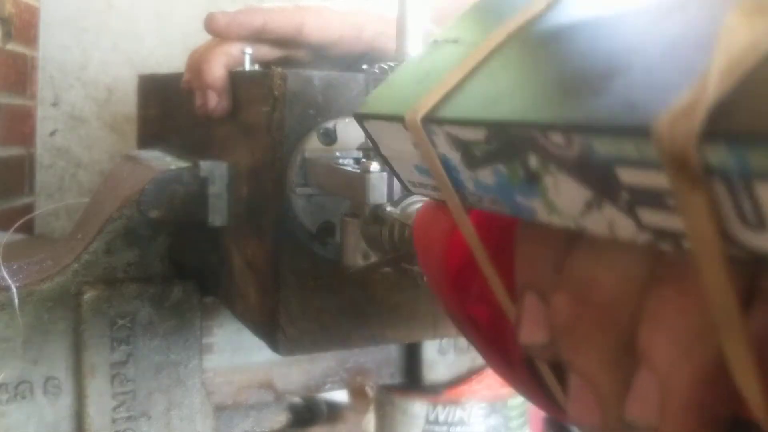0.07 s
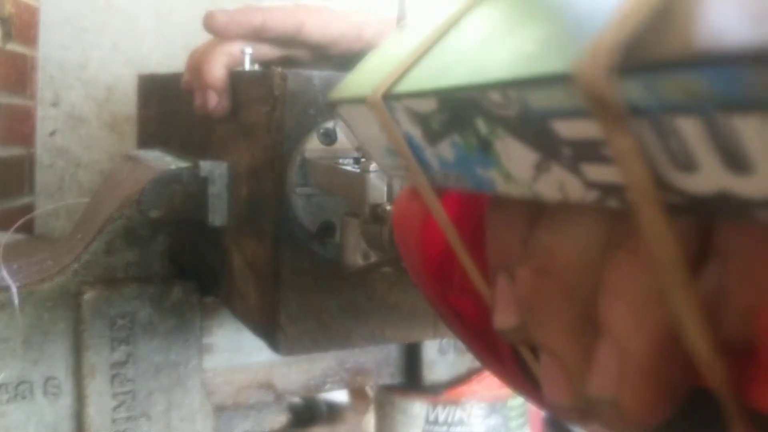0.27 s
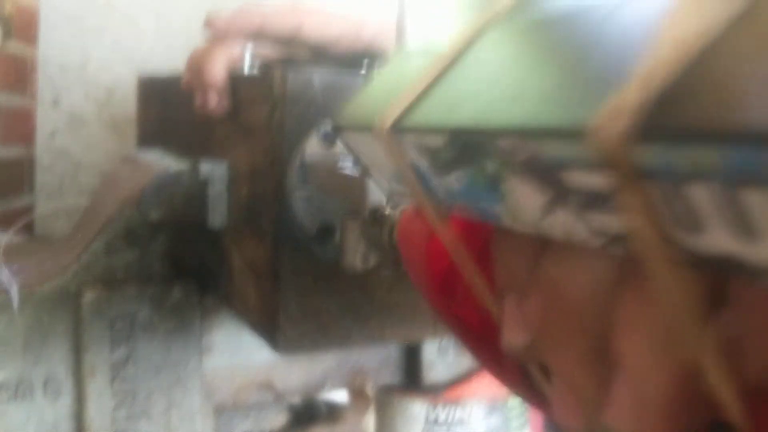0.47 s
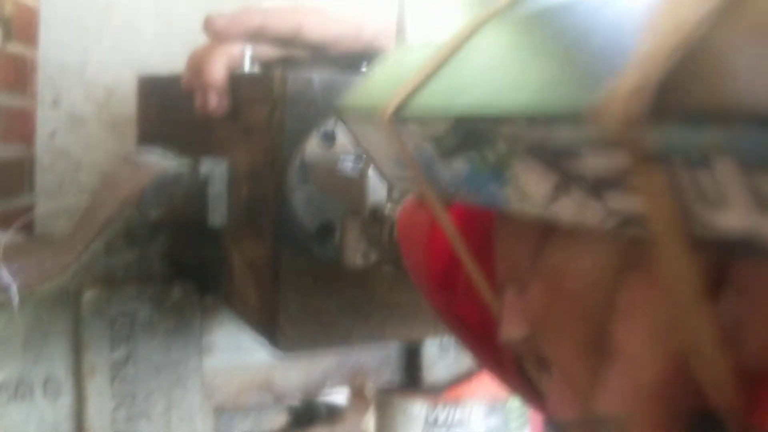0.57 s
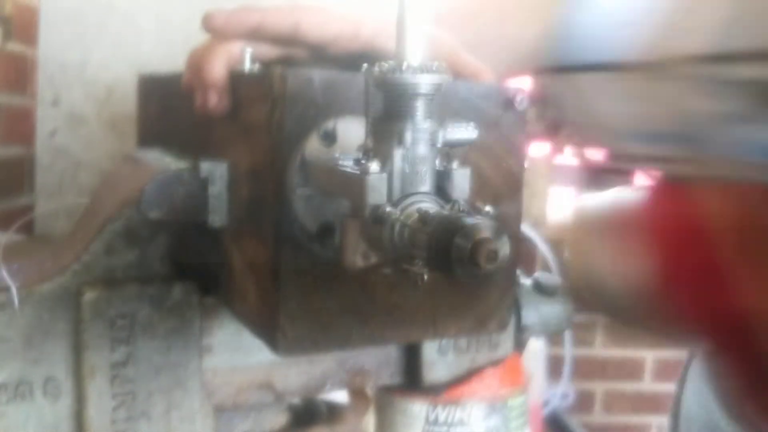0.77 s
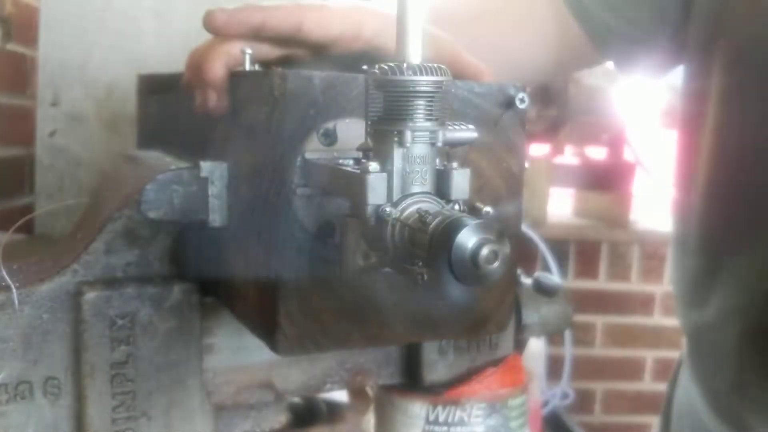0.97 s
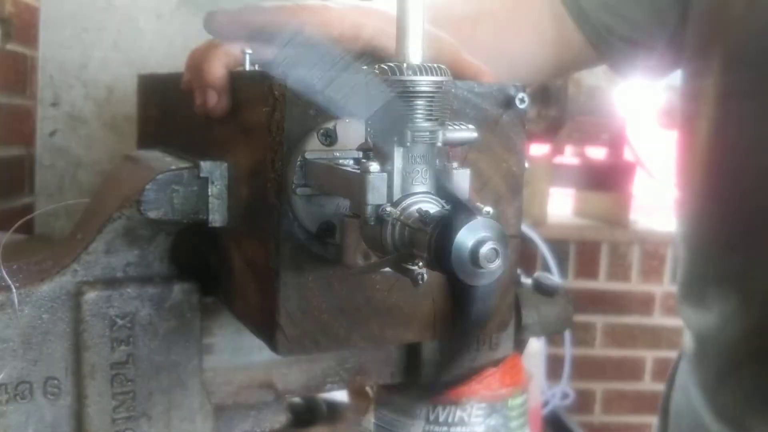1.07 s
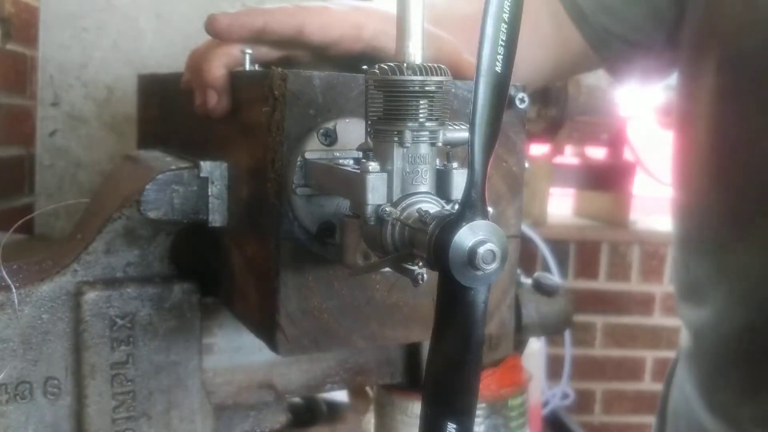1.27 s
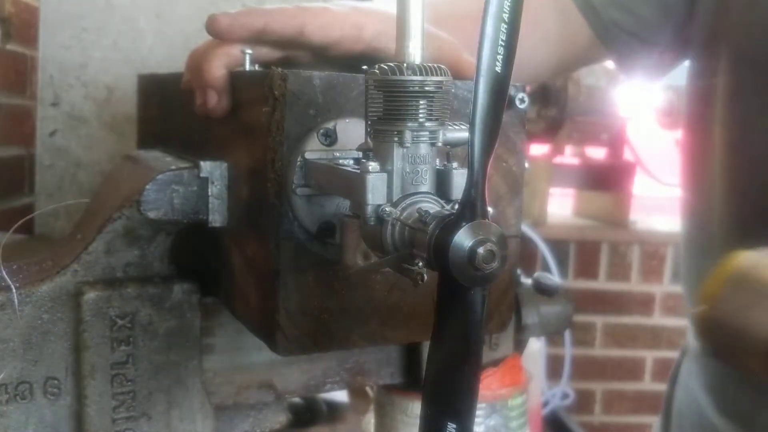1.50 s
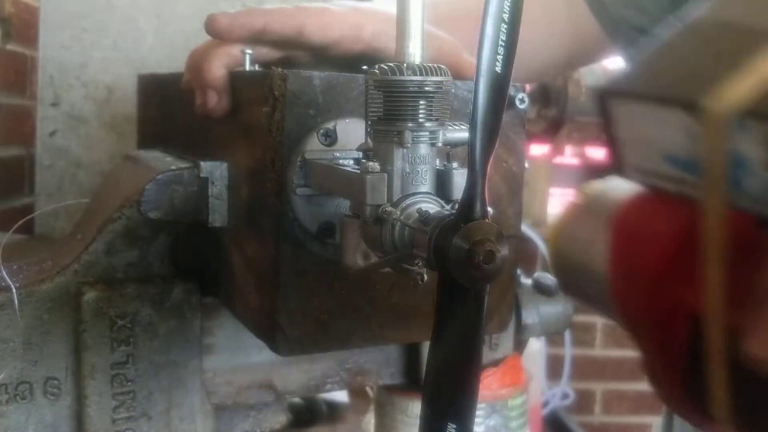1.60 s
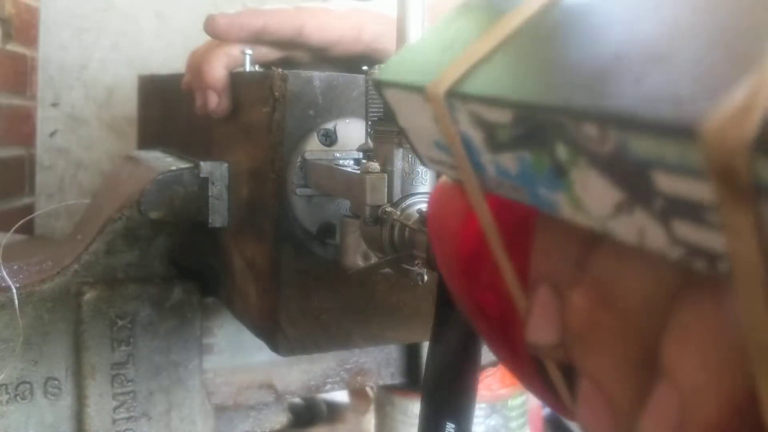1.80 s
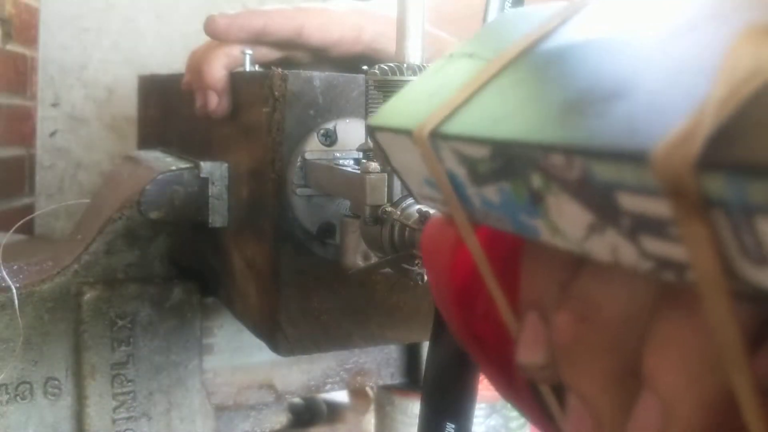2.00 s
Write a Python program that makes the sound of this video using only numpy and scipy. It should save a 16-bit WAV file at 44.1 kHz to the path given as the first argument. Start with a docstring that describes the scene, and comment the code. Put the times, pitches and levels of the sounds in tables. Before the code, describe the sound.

A model engine cranked by a handheld starter pops and clatters rapidly, then one knock.

```python
"""A low rumble and a rising rattle: a handheld electric starter spins a small model engine, clamped
in a vice by a brick wall, and the propeller stirs the air. The starter clacks, the piston squeaks, and
each turn ends in a soft puff of compressed air or, when the charge catches, a crack that overloads the
microphone. The engine coasts to rest, and the starter knocks back onto its nose."""
import sys
import numpy as np
from scipy import signal
from scipy.fft import rfft, irfft
from scipy.io import wavfile

SR = 44100
rng = np.random.default_rng(int(sys.argv[2]) if len(sys.argv) > 2 else 0)


def unload_wav(signal):
    """Save mono or channel-first audio to the path in sys.argv[1] as 16-bit WAV at rate SR, clipped to [-1, 1]."""
    wavfile.write(
        sys.argv[1],
        SR,
        np.round(np.clip(np.atleast_2d(signal).T, -1, 1) * 32767).astype(np.int16),
    )


N = 90404
TIME = np.arange(N) / SR


def from_db(db):
    """Decibels to gain."""
    return 10 ** (np.asarray(db) / 20)


def unit_rms(x):
    """Scale to unit power."""
    return x / np.sqrt(np.mean(x ** 2) + 1e-20)


def envelope(points):
    """Gain riding through (time [s], level [dB]) points."""
    return from_db(np.interp(TIME, *np.transpose(points)))


def impulses(hits):
    """One impulse for each (time [s], level [dB]) hit."""
    out = np.zeros(N)
    for s, db in hits:
        out[round(s * SR)] += from_db(db)
    return out


def eq(x, curve):
    """Minimum-phase EQ through (frequency [Hz], gain [dB]) points."""
    size = 8192
    hz, db = np.transpose(curve)
    grid = np.maximum(np.arange(size // 2 + 1) * SR / size, 1)
    gain = from_db(np.interp(np.log(grid), np.log(hz), db))
    cepstrum = irfft(np.log(gain))
    cepstrum[1:size // 2] *= 2  # fold onto positive time: no ringing ahead of a hit
    cepstrum[size // 2 + 1:] = 0
    response = irfft(np.exp(rfft(cepstrum)))[:size // 2]
    return signal.oaconvolve(x, response)[:N]


def decay(x, tau_s):
    """Lets each impulse die away exponentially."""
    return signal.lfilter([1], [1, -np.exp(-1 / (tau_s * SR))], x + 1e-18)


def ring(x, modes):
    """Damped resonances (frequency [Hz], level [dB], t60 [s]) driven by x."""
    out = 0
    for hz, db, t60 in modes:
        radius = from_db(-60 / (t60 * SR))
        real = radius * np.cos(2 * np.pi * hz / SR)
        out = out + from_db(db) * signal.lfilter([1, -real], [1, -2 * real, radius ** 2], x + 1e-18)
    return out


# Swell of the low end (time [s], level [dB])
RUMBLE_ENVELOPE = [(0, -27.5), (.04, -58), (.2, -46), (.3, -35.5), (.42, -29), (.49, -33), (.57, -29),
                   (.67, -30.5), (.78, -27.5), (.84, -47), (1.05, -34), (1.16, -46), (1.25, -46.5),
                   (1.44, -46), (1.52, -56), (2.05, -54.5)]
# Boomy tone of moving air and shaking bench (frequency [Hz], gain [dB])
RUMBLE_EQ = [(25, -26), (45, -13.5), (65, -10), (80, -13.5), (100, 0.5), (125, -6.5), (180, -14.5),
             (300, -24), (800, -30), (3000, -101)]
# Jolts to the bench (time [s], level [dB])
BUMPS = [(.0, -43), (.405, -17), (.560, -21), (.715, -17), (.778, -14.5), (1.563, -31)]
def rumble(bump_hz=95, bump_t60_s=0.11):
    """Propeller wash and bench vibration, with dull bumps as the starter jolts the bench."""
    bumps = ring(impulses(BUMPS), [(bump_hz, 0, bump_t60_s)])
    bumps = signal.sosfilt(signal.butter(2, 180, fs=SR, output="sos"), bumps)
    wash = unit_rms(eq(rng.standard_normal(N), RUMBLE_EQ))
    return envelope(RUMBLE_ENVELOPE) * wash + bumps


# Dark tone of the yard's ambience (frequency [Hz], gain [dB])
AIR_EQ = [(18, -27), (32, 6), (60, 13.5), (110, -5), (230, -4.5), (400, -5), (1000, -11), (2000, -11.5),
          (6000, -15.5), (16000, -19)]
def still_air(level_db=-48.5):
    """The air of the yard: a faint, steady bed of noise."""
    return from_db(level_db) * unit_rms(eq(rng.standard_normal(N), AIR_EQ))


# The rattle builds, holds and falls away (time [s], level [dB])
RATTLE_ENVELOPE = [(0, -76), (.13, -55), (.17, -44.5), (.215, -43.5), (.25, -35.5), (.4, -33.5), (.6, -31),
                   (.8, -32.5), (1.0, -30.5), (1.075, -35), (1.115, -33), (1.14, -47.5), (1.22, -51.5)]
# Its bright clatter (frequency [Hz], gain [dB])
RATTLE_EQ = [(100, -16), (450, -12), (1200, 3.5), (1900, 2), (3000, 2.5), (4000, 7), (5000, -4.5),
             (6500, -2.5), (9000, -1), (15000, 0)]
def drive_rattle(ticks_per_s=590, spread_db=1):
    """The spinning starter and crank throw off dense, uneven ticks."""
    sizes = from_db(spread_db * np.minimum(rng.exponential(1, N), 5))
    signs = rng.choice([-1, 1], N)
    ticks = sizes * signs * (rng.random(N) < ticks_per_s / SR)
    return envelope(RATTLE_ENVELOPE) * unit_rms(eq(ticks, RATTLE_EQ))


# Clack cues (time [s], level [dB])
CLACKS = [(.144, -21), (.195, -27), (.252, -16), (.294, -15), (.332, -7.5), (.960, -20), (.996, -10),
          (1.068, -17), (1.106, -11), (1.117, -6.5)]
def starter_clacks():
    """Small, hard hits as the starter grips and lets go."""
    return impulses(CLACKS)


# Turns that only release their compression (time [s], level [dB], hiss trim [dB])
PUFFS = [(.1660, -19, 1.5), (0.198, -20.5, 7), (0.2362, 1, 1.5), (0.2786, 2.5, 2), (0.3172, 2, 4.5),
         (0.3836, 0.5, 3), (0.4156, -2.5, 5.5), (0.5396, 0.5, -3), (0.5965, -0.5, 3.5), (0.653, -0.5, 2),
         (.7420, -1.5, 2), (0.8046, -3, 1), (0.87, -1, 5), (0.9732, -2.5, 1), (1.0452, -0.5, 3),
         (1.0866, -5.5, 6), (1.1753, -10.5, 5.5)]
# Body of a puff (frequency [Hz], gain [dB])
PUFF_EQ = [(30, -6), (70, -2.5), (130, 5), (250, -0.5), (390, -1.5), (490, 3.5), (620, -0.5), (860, 0.5),
           (1400, 8), (1900, -2.5), (3000, 10), (4000, -15), (5500, -13), (7000, -13), (15000, -20)]
# Its airy top (frequency [Hz], gain [dB])
HISS_EQ = [(300, -12), (1200, -2.5), (2000, 0), (3000, -8), (4000, 2.5), (5000, -0.5), (6600, 4.5),
           (9000, 0.5), (15000, 2.5)]
def puffs(rise_s=0.00035, fall_s=0.00023, hiss_s=0.0054, low_cut_hz=240, pulse_db=-6.5, hiss_db=-23.5):
    """The port opens on unburnt charge: a pressure pulse that swells and drops, and a hiss."""
    peaks = impulses((s, db) for s, db, _ in PUFFS)
    swells = decay(peaks[::-1], rise_s)[::-1]
    pulses = swells + decay(peaks, fall_s) - peaks  # count the shared peak once
    pulses = signal.sosfilt(signal.butter(1, low_cut_hz, "high", fs=SR, output="sos"), pulses)
    hiss_onsets = impulses((s, db + trim) for s, db, trim in PUFFS)
    hiss = decay(hiss_onsets, hiss_s) * rng.standard_normal(N)
    return from_db(pulse_db) * eq(pulses, PUFF_EQ) + from_db(hiss_db) * eq(hiss, HISS_EQ)


# Squeak cues (time [s], length [s], level [dB])
SQUEAKS = [(.220, 0.042, -31), (0.257, 0.048, -30.5), (0.296, 0.048, -34.5), (1.225, 0.036, -41.5),
           (1.26, .08, -46.5)]
# Thin tone of the rubbing piston (frequency [Hz], gain [dB])
SQUEAK_EQ = [(500, -8.5), (1800, -8), (2280, 4), (2600, 2), (2980, -10.5), (3500, -9), (4350, -8),
             (5400, -21), (6800, -2.5), (8500, -17.5)]
def piston_squeaks():
    """Friction swells and fades as the piston creeps up its bore against compression."""
    swells = np.zeros(N)
    for s, length, db in SQUEAKS:
        progress = np.clip((TIME - s) / length, 0, 1)
        swells += from_db(db) * np.sin(np.pi * progress)
    return swells * unit_rms(eq(rng.standard_normal(N), SQUEAK_EQ))


# Turns that fire (time [s], level [dB], blast and jet trim [dB], jet centre [Hz])
FIRINGS = [(0.3521, 0, -0.5, 4200), (.4481, -1, 1, 4000), (0.4791, -3, 1.5, 5400), (0.5095, -0.5, 2, 4650),
           (0.5683, -3.5, 9.5, 4630), (0.6258, -1.5, 5.5, 4630), (0.6819, -4, -27, 3950),
           (0.7116, -1, 3.5, 5100), (0.7726, 0.5, 6, 5900), (0.84, -3, -0.5, 4100), (0.9048, -2, 6.5, 4160),
           (0.9392, -2, 4.5, 4330), (1.0113, -3, 4.5, 4340)]
# Punch of a crack (frequency [Hz], gain [dB])
CRACK_EQ = [(60, -6), (150, 2), (330, -8.5), (410, -5.5), (500, 5.5), (620, -0.5), (830, 4.5), (1050, 0.5),
            (1350, 0.5), (1900, -3.5), (2600, -6.5), (3200, -4), (4200, -3), (6500, -8), (15000, -11.5)]
def firings(shock_db=23.5, blast_db=-1.5, blast_s=0.0022, blast_low_cut_hz=1800,
            jet_db=-6.5, jet_s=0.0035, jet_width_hz=2250):
    """Each ignition is a pressure shock, a broad turbulent blast and an exhaust jet with its own band."""
    shocks = impulses((s, db) for s, db, _, _ in FIRINGS)
    blast_onsets = impulses((s, db + trim) for s, db, trim, _ in FIRINGS)
    blast = decay(blast_onsets, blast_s) * rng.standard_normal(N)
    blast = signal.sosfilt(signal.butter(1, blast_low_cut_hz, "high", fs=SR, output="sos"), blast)
    jets = np.zeros(N)
    t = TIME[:SR // 20]
    for s, db, trim, hz in FIRINGS:
        gas = rng.standard_normal(len(t)) * np.exp(-t / jet_s) * from_db(jet_db + db + trim)
        band = signal.iirpeak(hz, hz / jet_width_hz, fs=SR)
        jets[round(s * SR):][:len(t)] += signal.lfilter(*band, gas)
    return eq(from_db(shock_db) * shocks + from_db(blast_db) * blast, CRACK_EQ) + jets


# Ring of starter cone on spinner (frequency [Hz], level [dB], t60 [s])
KNOCK_MODES = [(328, -29, .03), (515, -6.5, 0.057), (727, -11.5, 0.13), (880, 0, .03), (1160, 6, 0.022),
               (1260, 0, 0.035), (1480, 7.5, 0.02), (2310, -12, 0.2), (2270, 8.5, 0.018),
               (2500, -31.5, 0.015), (4060, 1, 0.035), (4480, -16, .02), (6680, 3, 0.023)]
# Grit of the contact (frequency [Hz], gain [dB])
TICK_EQ = [(100, 2), (1200, -4), (2500, 16.5), (3100, -33), (4500, 3), (6500, 5.5), (15000, -3)]
def starter_knock(time_s=1.8268, ring_db=-31, tick_db=-25.5, tick_s=0.0047):
    """The starter is set back on the spinner: a gritty tick and a short ring."""
    contact = impulses([(time_s, 0)])
    tick = eq(rng.standard_normal(N) * decay(contact, tick_s), TICK_EQ)
    return from_db(ring_db) * ring(contact, KNOCK_MODES) + from_db(tick_db) * tick


def reverb_tail(predelay_s, t60_s):
    """A diffuse decay of unit energy."""
    fade = decay(impulses([(predelay_s, 0)]), t60_s / np.log(1000))
    return unit_rms(rng.standard_normal(N) * fade) / np.sqrt(N)


# Early reflections off vice, bench and wall (delay [s], level [dB])
REFLECTIONS = [(.00115, -8.5), (.00175, -8.5), (.00362, -11.5), (.00415, -10), (.00545, -13.5),
               (.0080, -24.5), (.0120, -20.5)]
# Warm tone of the yard's reverb (frequency [Hz], gain [dB])
YARD_EQ = [(60, -1), (120, 12), (250, 11), (500, 3.5), (1400, 0.5), (2500, 3), (6000, 2), (15000, 2.5)]
def surroundings(x, direct_s=0.00083, scatter_db=-8.5, yard_db=-18):
    """Direct sound, hard reflections close by, scatter from the bench and a short yard tail."""
    early = impulses([(direct_s, 0)] + REFLECTIONS)
    scatter = reverb_tail(predelay_s=0.0024, t60_s=0.028)
    yard = eq(reverb_tail(predelay_s=0.01, t60_s=0.23), YARD_EQ)
    response = early + from_db(scatter_db) * scatter + from_db(yard_db) * yard
    return signal.oaconvolve(x, response[:SR // 2])[:N]


# Ring of exhaust stub, cylinder and mount (frequency [Hz], level [dB], t60 [s])
ENGINE_MODES = [(300, -55, 0.057), (474, -43.5, 0.033), (554.5, -39.5, 0.047), (754, -42.5, 0.033),
                (967, -46.5, 0.038), (1200, -39, .022), (1364, -36, 0.012), (1824, -34.5, 0.045),
                (2423, -38, 0.023), (2570, -31.5, .015), (3800, -36, 0.015), (4050, -31.5, 0.025),
                (4350, -35.5, 0.018), (5064, -33, .015), (5440, -42.5, 0.021), (6480, -46.5, 0.066)]
def scene():
    """The mono mix: ringing engine and knock in the yard; rumble, air, rattle and squeaks stay dry."""
    engine = starter_clacks() + firings() + puffs()
    hits = surroundings(engine + ring(engine, ENGINE_MODES) + starter_knock())
    return (hits + still_air() + drive_rattle() + piston_squeaks() + rumble())[None]


# A dull microphone that loses its top octave (frequency [Hz], gain [dB])
MICROPHONE_EQ = [(20, -22.5), (60, 1.5), (6800, -2), (7300, -7), (8200, -19.5), (10200, -15.5),
                 (12000, -18.5), (16000, -19)]
def record(dry, capsule_limit=1.06, ceiling=0.81, high_cut_hz=16200):
    """The cracks saturate the microphone and soft-clip at the recorder's ceiling; the top is cut."""
    saturated = capsule_limit * np.tanh(dry[0] / capsule_limit)
    dulled = eq(saturated, MICROPHONE_EQ)
    clipped = dulled / (1 + (dulled / ceiling) ** 8) ** (1 / 8)
    high_cut = signal.firwin(201, high_cut_hz, window=("kaiser", 8), fs=SR)
    return np.convolve(clipped, high_cut, "same")[None]


dry = scene()
out = record(dry)
unload_wav(out)
```